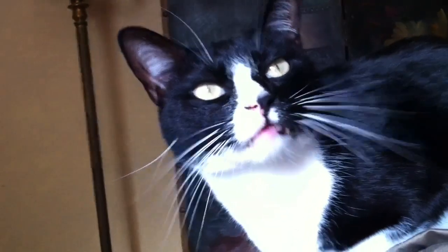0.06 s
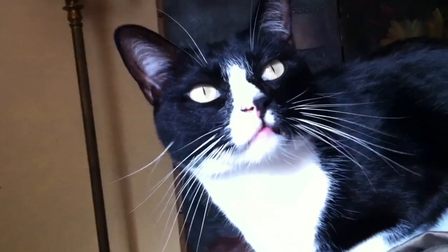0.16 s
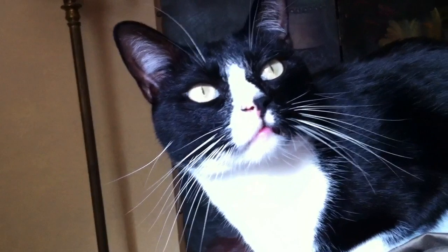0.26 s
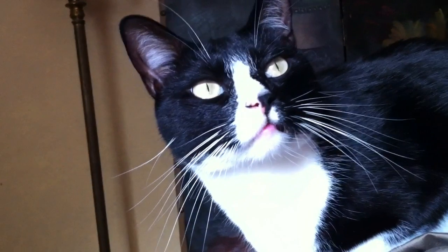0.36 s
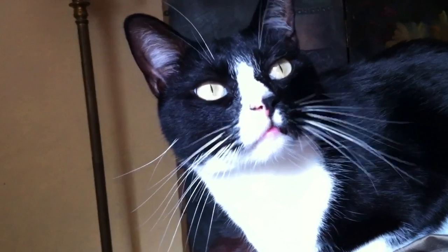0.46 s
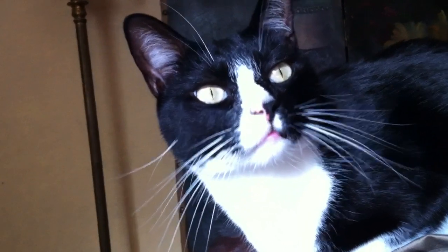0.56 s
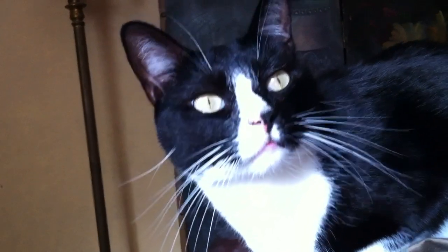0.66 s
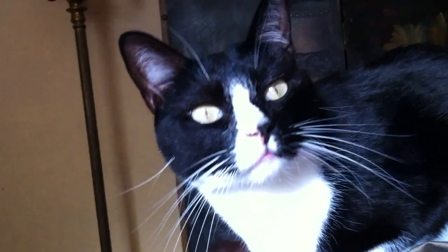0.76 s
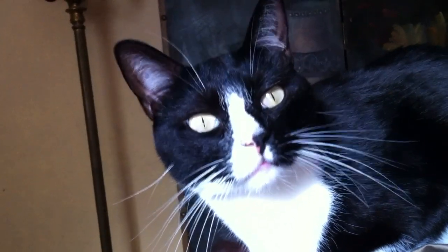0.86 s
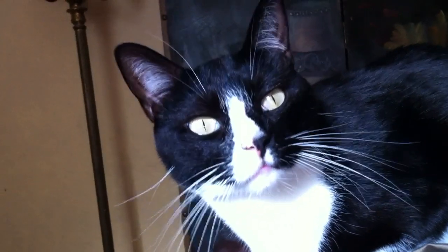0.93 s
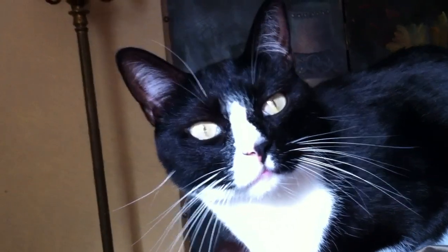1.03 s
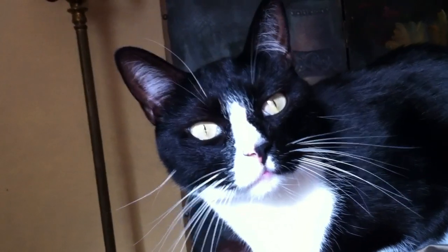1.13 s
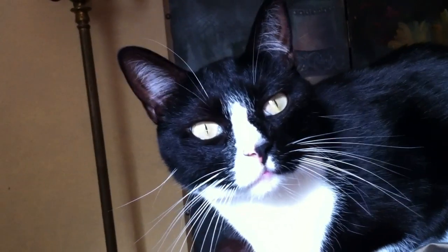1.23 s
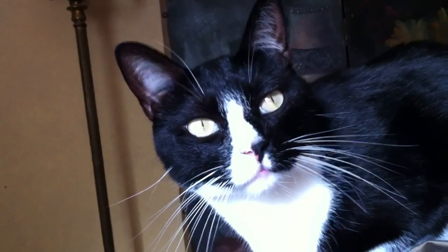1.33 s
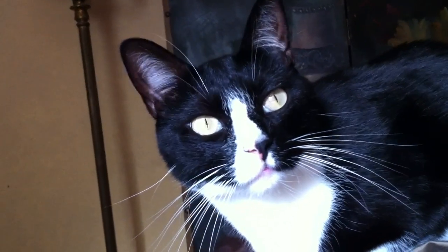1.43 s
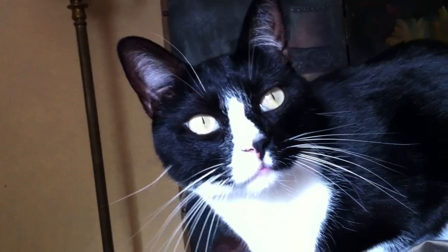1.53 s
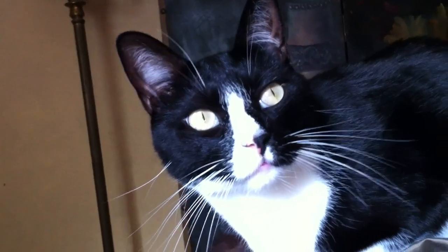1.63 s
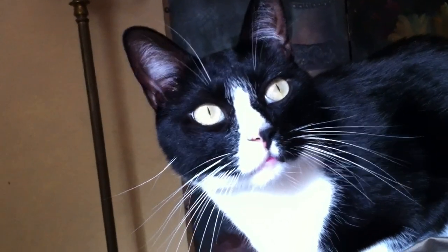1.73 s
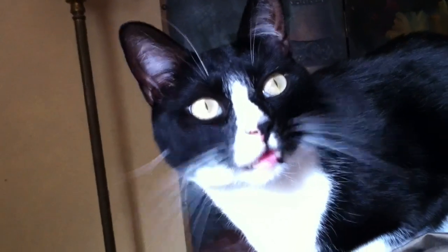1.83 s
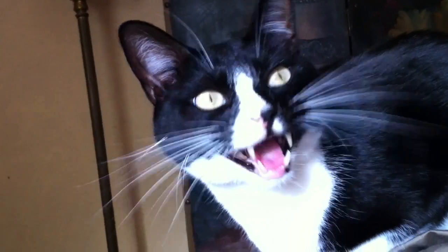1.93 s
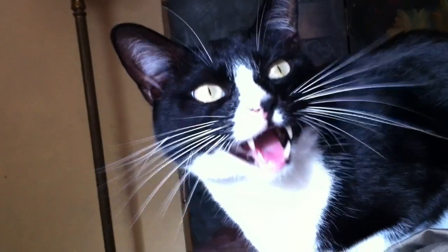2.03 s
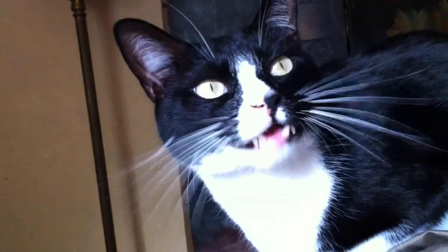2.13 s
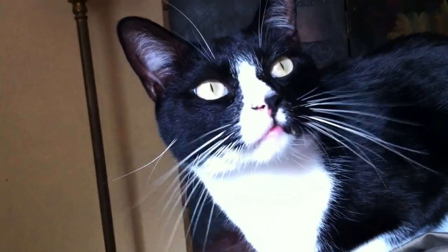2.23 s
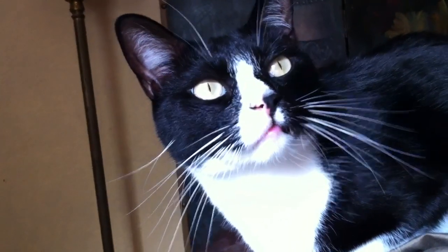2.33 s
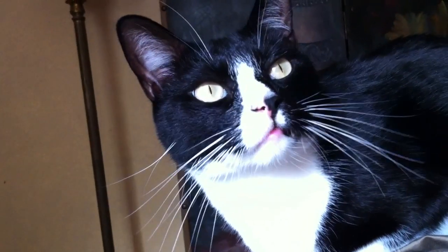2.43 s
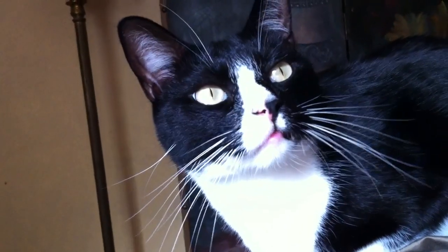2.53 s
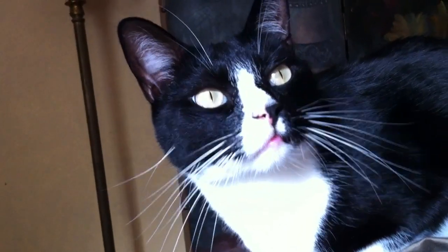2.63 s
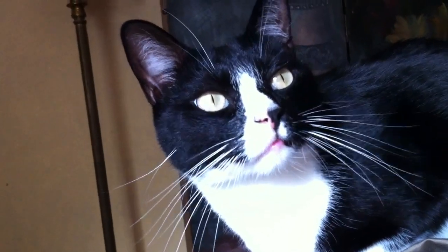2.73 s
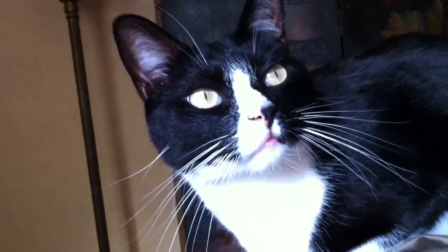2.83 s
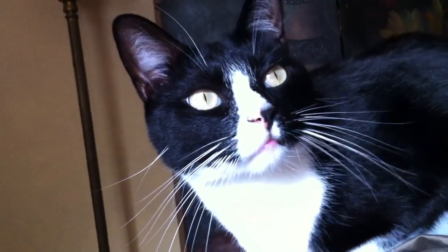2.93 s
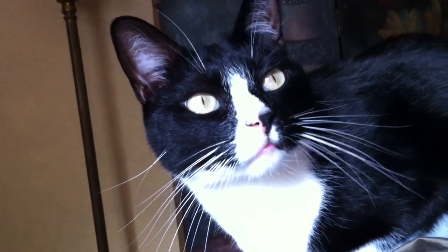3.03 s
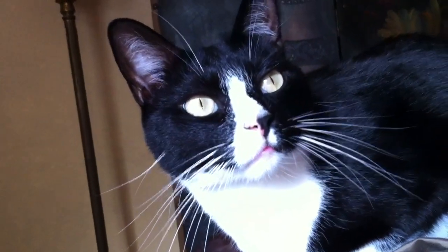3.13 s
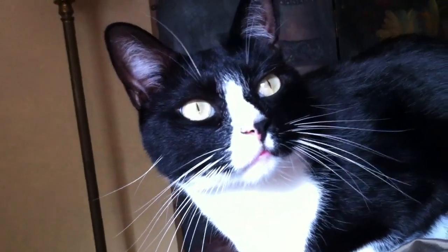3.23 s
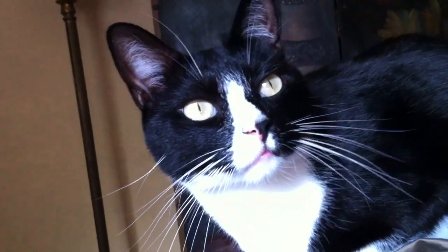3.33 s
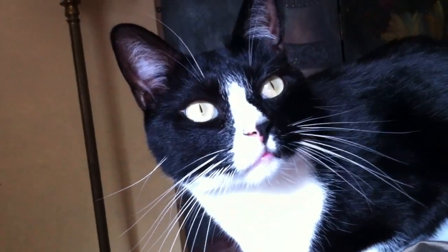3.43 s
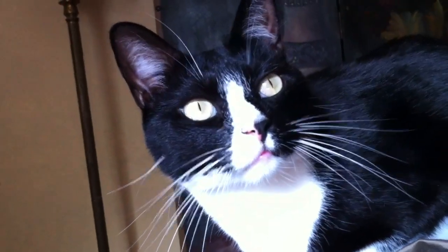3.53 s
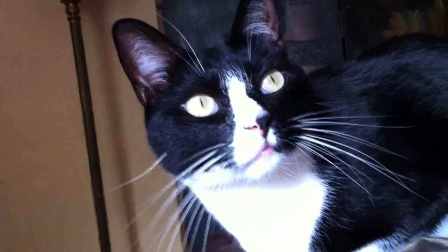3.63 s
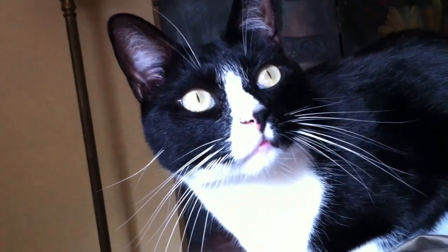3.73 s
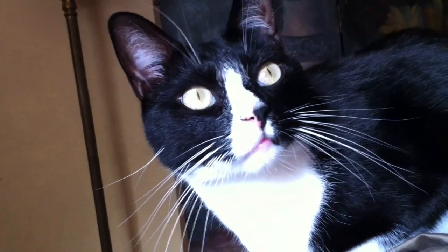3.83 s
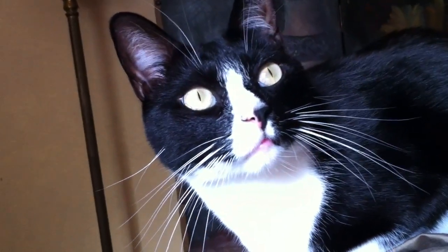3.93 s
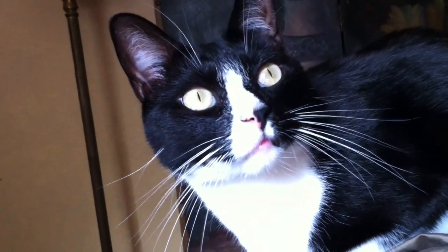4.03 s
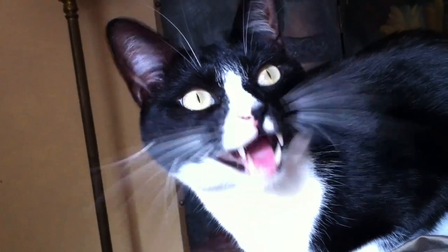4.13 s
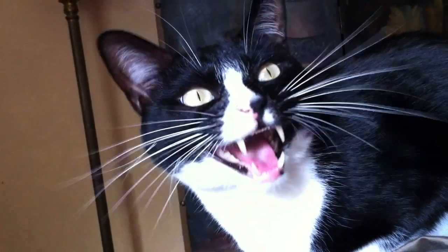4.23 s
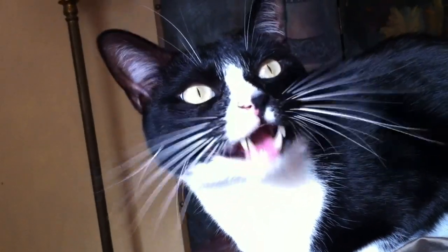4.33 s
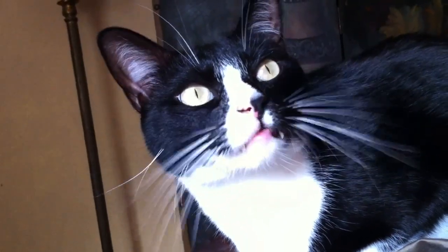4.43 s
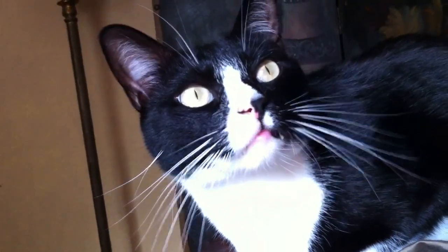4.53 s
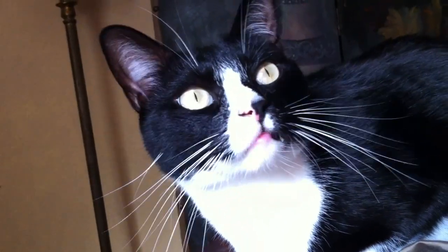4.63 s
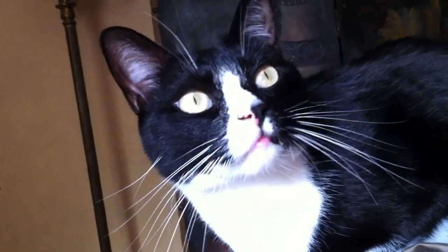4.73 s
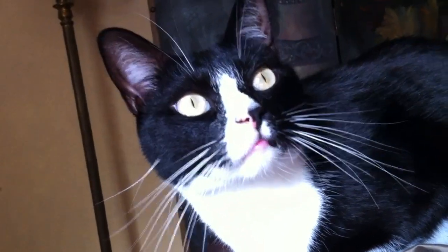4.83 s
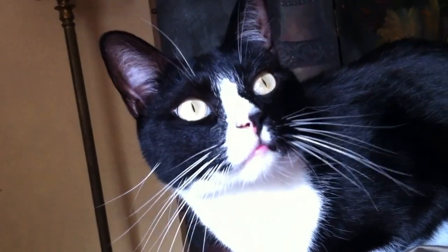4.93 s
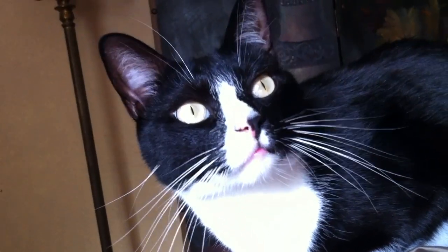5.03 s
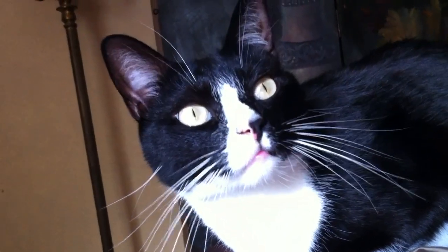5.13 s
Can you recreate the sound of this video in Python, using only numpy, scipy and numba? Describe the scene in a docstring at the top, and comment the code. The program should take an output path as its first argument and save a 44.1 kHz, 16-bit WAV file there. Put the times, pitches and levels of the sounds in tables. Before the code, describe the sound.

A cat close by gives three short, sharp, slightly raspy meows about two seconds apart, purring faintly between them in a quiet room.

```python
"""A quiet room: a cat close by meows three times and purrs softly in between.
Each cry is glottal pulses and turbulence through throat, mouth and nose: it opens with a rasp, its resonance falling
as the jaw closes, then flips up an octave into a thin closed-mouth whine and breaks into purred croaks.
A squeak leads into the second meow; lips smack, one faint tick sounds, the purr is a train of chest thumps.
Filtered noise for room air and hiss, with two wavering sines for a hum, lie underneath."""
import sys
import numpy as np
from scipy import signal
from scipy.fft import rfft, irfft
from scipy.io import wavfile
from scipy.ndimage import uniform_filter1d
from numba import njit

SR = 44100
rng = np.random.default_rng(int(sys.argv[2]) if len(sys.argv) > 2 else 0)


def materialize(psi):
    """Save the field psi as 16-bit PCM at rate SR to the path in sys.argv[1].

    A 1-D psi becomes a single channel; in a 2-D psi each row is a channel.
    """
    bounded = np.clip(np.atleast_2d(psi).T, -1, 1)
    quanta = np.round(bounded * 32767).astype(np.int16)
    wavfile.write(sys.argv[1], SR, quanta)


N = 227596
TIME = np.arange(N) / SR

# open-mouthed cries, the last row being the squeak before the second meow: start t/s, end t/s, attack t/s,
# jaw half shut after t/s, closing time constant t/s, wide-open mouth resonance f/Hz,
# wide-open second resonance f/Hz, level/dB, treble level/dB
CRY_SETTINGS = [(.004, 0.24, 0.016, 0.15, .028, 2320, 2770, -36, -39.5),
                (2.096, 2.336, 0.011, 0.18, 0.038, 2293, 2730, -36.5, -41.5),
                (4.312, 4.6, 0.025, 0.2, 0.047, 2523, 2910, -35, -37.5),
                (2.047, 2.097, .001, 0.22, 0.027, 2440, 2750, -47, -52.6)]
# pitch line of each cry: t/s, f/Hz
CRY_PITCH_LINES = [
    [(0.004, 340.2), (0.04, 307.3), (0.084, 295.7), (0.1, 307.1), (0.148, 289.3), (0.176, 299.6),
     (0.21, 292), (0.228, 302.7), (0.258, 338)],
    [(2.097, 350), (2.115, 314), (2.125, 307.2), (2.185, 300), (2.247, 295.8), (2.273, 309), (2.295, 298.8),
     (2.323, 320.5), (2.335, 322)],
    [(4.313, 316), (4.333, 295.7), (4.353, 307.1), (4.365, 285.9), (4.419, 295.2), (4.491, 290.3),
     (4.569, 312.4), (4.585, 322.6), (4.6, 322)],
]
# pitch line of the squeak, in the high register: t/s, f/Hz
SQUEAK_PITCH_LINE = [(2.048, 804), (2.063, 700), (2.074, 860), (2.097, 750)]
# rasp of each cry: opening roughness/0-1, lasting t/s, voice breaks after t/s, closing roughness/0-1
CRY_RASPS = [(.5, .014, .18, .35), (.35, .016, .185, .48), (.52, .066, .225, .58), (.12, .02, .022, .3)]
# throat resonances: f/Hz, width f/Hz, relative level/dB
THROAT_MODES = [(600, 290, 8), (974, 170, 15), (1135, 1230, 11.5)]
# fixed resonance that colours every cry: f/Hz, width f/Hz, level/dB
CRY_COLOUR_MODES = [(2110, 170, -1)]
# pitch line of the closed-mouth whine that ends each meow: t/s, f/Hz
WHINE_PITCH_LINES = [
    [(0.23, 626), (0.296, 651), (0.348, 651.6), (0.368, 674), (0.402, 642), (0.46, 637)],
    [(2.315, 657), (2.369, 677.4), (2.477, 708.6), (2.537, 663.5), (2.557, 718), (2.65, 680)],
    [(4.55, 629), (4.624, 666.7), (4.644, 644), (4.674, 715), (4.712, 675), (4.83, 693)],
]
# each whine at the usual pitch, halfway through: level/dB
WHINE_LEVELS = [-59, -54, -53]
# partials of the whine: multiple of the pitch, relative level/dB
WHINE_OVERTONES = [(1, -1.5), (2, -11), (3, -19), (4, -31)]
# runs of croaks as the voice breaks into a purr: first t/s, last t/s, croaks,
# level at mid-run/dB, half-length of each t/s
CROAK_RUNS = [(0.408, .598, 6, -54, 0.019), (2.516, 2.516, 1, -64, 0.0056), (2.655, 2.695, 3, -50.5, 0.012),
              (4.627, 4.625, 1, -44.5, 0.0065), (4.84, 4.841, 1, -49.5, 0.01),
              (4.878, 4.877, 1, -52.5, 0.018)]
# closed mouth ringing to the croaks: f/Hz, width f/Hz, relative level/dB
CROAK_RESONANCES = [(674, 52, 12), (956, 170, 10.5), (1370, 900, -51)]
# lips shut or part with a tick: t/s, level/dB
LIP_SMACKS = [(0.614, -60), (2.709, -49.5), (4.892, -51.5)]
# resonances of the lip smacks: f/Hz, width f/Hz, relative level/dB
LIP_RESONANCES = [(890, 630, 4.5), (2300, 480, 4), (3440, 610, 2.5), (5540, 1000, 6.5)]
# bouts of purring: start t/s, end t/s, pulse rate f/Hz, peak level at mid-bout/dB
PURR_BOUTS = [(1.0133, 1.195, 24.85, -55), (1.215, 1.67, 24.65, -59.5), (3.318, 4.1, 27, -58.5)]
# chest resonances: f/Hz, width f/Hz, relative level/dB
CHEST_MODES = [(115.4, 26, 4.5), (204, 160, -4.5), (364, 450, -7)]
# a faint lone tick: t/s, f/Hz, level/dB, decay t/s
LONE_TICK = (1.667, 2050, -54.5, .004)
# nearby surfaces: delay t/s, level/dB
EARLY_ECHOES = [(.00125, -18), (.00295, -23), (.0052, -23)]
# tonal colour of room air and microphone hiss: f/Hz, relative density level/dB per Hz
AIR_COLOUR = [(20, -27), (60, -28), (90, -27.5), (125, -10), (210, -9.5), (290, -5), (330, -7.5),
              (400, -13.5), (700, -17), (2000, -20.5), (8500, -25.5), (15500, -26)]
# appliance hum: f/Hz, level/dB
HUM_TONES = [(260.5, -70), (111, -84.5)]

# cry: the two lower resonances close down to the SHUT values, the top one dips midway
MOUTH_SHUT_HZ, SECOND_SHUT_HZ = 920, 2290
TOP_MIDWAY_HZ, TOP_OPEN_HZ, TOP_SHUT_HZ = 4110, 5020, 4550
MOUTH_MUFFLING, TREBLE_MUFFLING = 1.53, 3.35   # dB lost per dB that the mouth resonance falls
# the push of air runs out
MOUTH_SAG_DB_PER_S, TREBLE_SAG_DB_PER_S, THROAT_SAG_DB_PER_S = 4.5, 24.5, 24
ONSET_SHARE = 0.39   # a cry jumps to this share of its strength, then swells
CLEAR_ROUGHNESS, RASP_CHANGE_S = .065, .004
THROB_HZ, THROB_DB = 34.1, 2.5   # a rough voice throbs; depth at full roughness
# whine: effort lifts pitch and level together, then ebbs
WHINE_USUAL_HZ, WHINE_DB_PER_HZ, WHINE_SAG_DB_PER_S = 673.5, 0.0542, 13.5
WHINE_FLUTTER_DB, OVERTONE_FLUTTER_DB, FLUTTER_PER_S = 1.0, 2.2, 110
WHINE_WAVER_DB, WAVER_PER_S = 1.5, 40
HALF_TONE_DB, HALF_TONE_SWING_DB = -23, 5
# croaks and purr: runs and bouts are weaker at their edges; a creak runs under each whine
CROAK_EDGE_DB, PURR_EDGE_DB = 7.5, 3.5
CREAK_DB, CREAK_SWING_DB, CREAK_PER_S = -13, 4, 50
PURR_TOP_HZ = 530
AIR_DB = -66.5   # level of the air noise above 530 Hz
CUTOFF_HZ = 15780


def amp(db):
    """Decibels to gain."""
    return 10 ** (np.asarray(db) / 20)


def rms_one(x):
    """Scale to unit power."""
    return x / np.sqrt(np.mean(x ** 2) + 1e-20)


def evened(x, window_s):
    """Hold the short-term power at one."""
    power = np.abs(uniform_filter1d(x ** 2, max(int(window_s * SR), 8)))
    return x / np.sqrt(power + 1e-12)


def curves(rows, t):
    """Read each column of a table at the times t."""
    s, *columns = np.transpose(rows)
    return [np.interp(t, s, c) for c in columns]


def gate(start, end, fade_s):
    """The samples that a call covers, and its soft-edged on/off envelope."""
    edge = np.clip(np.minimum(TIME - start, end - TIME) / fade_s + .5, 0, 1)
    where = np.flatnonzero(edge)
    return where, np.sin(edge[where] * np.pi / 2) ** 2


def step(t, width_s):
    """A smooth step from 0 to 1 around t = 0."""
    return .5 + .5 * np.tanh(t / (2 * width_s))


def arch(count, edge_db):
    """Levels in dB of a run of pulses that swells and fades."""
    return -edge_db * ((2 * np.arange(count) + 1) / count - 1) ** 2


def cut(x, hz, kind, order=2):
    """Butterworth filter."""
    return signal.sosfilt(signal.butter(order, hz, kind, fs=SR, output="sos"), x)


def drift(rate):
    """Random wander: straight lines between unit-spread random points, rate of them a second."""
    knots = rng.standard_normal(N)
    return np.interp(TIME * rate, np.arange(N), knots)


@njit
def resonate(x, hz, width):
    """Two-pole resonance with a moving centre; gain one on top."""
    y, r = np.zeros(len(x)), np.exp(-np.pi * width / SR)
    for i in range(2, len(x)):
        drive = (1 - r * r) / 2 * (x[i] - x[i - 2])
        y[i] = drive + 2 * r * np.cos(2 * np.pi * hz[i] / SR) * y[i - 1] - r * r * y[i - 2]
    return y


def body(x, modes):
    """Fixed resonances in parallel, signs alternating."""
    x = x + 1e-18 * (np.arange(len(x)) % 3)   # an inaudible floor under digital silence
    out = 0
    for k, (hz, width, db) in enumerate(modes):
        out = out + (-1) ** k * amp(db) * resonate(x, np.full(len(x), float(hz)), float(width))
    return out


def cry(row, rasp, pitch_rows, mouth_width=138.0, second_width=97.0, second_db=-3.5, second_power=3.7,
        open_hz=2120.0, nose_hz=3195.0, nose_width=320.0, top_width=196.0, top_db=-11.5, throat_db=-10.0,
        hiss_db=0.0, rasp_treble_db=5.5, nose_power=3.3):
    """The folds sound through throat, mouth and nose; a wide jaw raises the resonances and frees the upper ones."""
    start, end, attack_s, half_shut_s, closing_s, wide_hz, second_wide_hz, level_db, treble_db = row
    where, on = gate(start, end, fade_s=.003)
    t = TIME[where]
    age = t - t[0]
    mouth_hz, second_hz, top_hz = tract(age, half_shut_s, closing_s, wide_hz, second_wide_hz)
    rough = roughness(age, *rasp)
    swell = np.minimum(1, ONSET_SHARE + (1 - ONSET_SHARE) * age / attack_s)
    throb = amp(THROB_DB * rough * np.cos(2 * np.pi * THROB_HZ * (age - attack_s)))
    on = on * swell * throb

    closing = mouth_hz / wide_hz
    throat_level = amp(level_db + throat_db - THROAT_SAG_DB_PER_S * age)
    mouth_level = amp(level_db - MOUTH_SAG_DB_PER_S * age) * closing ** MOUTH_MUFFLING
    treble_level = amp(treble_db + rasp_treble_db * rough - TREBLE_SAG_DB_PER_S * age)
    treble_level = treble_level * closing ** TREBLE_MUFFLING

    source = folds(curves(pitch_rows, t)[0], rough, where)
    opening = mouth_hz / open_hz
    throat = cut(cut(body(source, THROAT_MODES), 627, "high", order=3), 1110, "low")
    second = amp(second_db) * opening ** second_power * resonate(source, second_hz, second_width)
    mouth = cut(second - resonate(source, mouth_hz, mouth_width), 5200, "low", order=4)
    mouth = mouth + body(mouth, CRY_COLOUR_MODES)
    nose_line = np.full(len(t), nose_hz)
    nose = resonate(resonate(source, nose_line, nose_width), nose_line, 1300.0)
    top = amp(top_db) * resonate(resonate(source, top_hz, top_width), top_hz, 1400.0)
    # a forced, rough voice hisses between the teeth
    jet = cut(cut(rng.standard_normal(N)[where], 1730, "high", order=3), 5360, "low", order=8)
    hiss = amp(hiss_db) * rough * opening ** 4 * jet
    treble = top - opening ** nose_power * nose + hiss

    out = np.zeros(N)
    for part, level in (throat, throat_level), (mouth, mouth_level), (treble, treble_level):
        out[where] += on * level * evened(part, window_s=0.0092)
    return out


def tract(age, half_shut_s, closing_s, wide_hz, second_wide_hz):
    """The jaw closes in one smooth move: the two lower resonances fall with it, the top one dips midway."""
    jaw = step(half_shut_s - age, closing_s)
    mouth_hz = MOUTH_SHUT_HZ + jaw * (wide_hz - MOUTH_SHUT_HZ)
    second_hz = SECOND_SHUT_HZ + jaw * (second_wide_hz - SECOND_SHUT_HZ)
    top_end_hz = np.where(jaw > .5, TOP_OPEN_HZ, TOP_SHUT_HZ)
    top_hz = TOP_MIDWAY_HZ + (2 * jaw - 1) ** 2 * (top_end_hz - TOP_MIDWAY_HZ)
    return mouth_hz, second_hz, top_hz


def roughness(age, opening, lasting_s, breaks_s, closing):
    """A cry starts with a rasp, clears, and roughens again as the voice breaks."""
    opening_rasp = (opening - CLEAR_ROUGHNESS) * step(lasting_s - age, RASP_CHANGE_S)
    closing_rasp = (closing - CLEAR_ROUGHNESS) * step(age - breaks_s, RASP_CHANGE_S)
    return CLEAR_ROUGHNESS + opening_rasp + closing_rasp


def folds(pitch, rough, where, jitter=0.049, shimmer=0.29, turbulence=4.0, turbulence_hz=1050.0, rebound=0.016):
    """Glottal pulses with a weak rebound halfway; roughness makes them uneven and adds bright puffs of turbulence."""
    uneven_pitch = pitch * (1 + jitter * rough * drift(400)[where])
    phase = 2 * np.pi * np.cumsum(uneven_pitch) / SR
    pulses = rms_one(sum((1 + rebound * (-1) ** k) * np.cos(k * phase) for k in range(1, 27)))
    breath = cut(rng.standard_normal(N)[where], turbulence_hz, "high")
    puffs = rms_one((2 + np.cos(phase)) * breath)
    return pulses * (1 + shimmer * rough * drift(500)[where]) + turbulence * rough * puffs


def whine(pitch_rows, usual_db, jitter=0.0098, loud_db=-59.0, steepen=0.28, top_db=-17.0, top_width=320.0,
          ring_hz=5150.0, leak_db=-14.5, lips_rise_hz=650.0, lips_closing_s=0.15, top_fade_db_per_s=18.0):
    """With the mouth nearly shut the folds flip up an octave into an unsteady tone, the purer the softer it is."""
    where, on = gate(pitch_rows[0][0], pitch_rows[-1][0], fade_s=.014)
    age = TIME[where] - TIME[where[0]]
    pitch, = curves(pitch_rows, TIME[where])
    effort_db = WHINE_DB_PER_HZ * (pitch - WHINE_USUAL_HZ)
    level_db = usual_db + effort_db - WHINE_SAG_DB_PER_S * (age - age.mean())
    phase = 2 * np.pi * np.cumsum(pitch * (1 + jitter * drift(180)[where])) / SR
    tone = 0
    for k, (multiple, db) in enumerate(WHINE_OVERTONES):
        overtone_db = steepen * (level_db - loud_db) + OVERTONE_FLUTTER_DB * drift(FLUTTER_PER_S)[where]
        tone += np.sqrt(2) * amp(db + (k > 0) * overtone_db) * np.sin(round(multiple) * phase)
    # a partial at one and a half times the pitch makes alternate cycles differ, by a wandering amount
    half_tone = amp(HALF_TONE_DB + HALF_TONE_SWING_DB * drift(WAVER_PER_S)[where])
    tone += half_tone * np.sin(phase + phase / 2 + drift(FLUTTER_PER_S)[where])

    # the top resonance keeps ringing, and fades as the lips push it higher
    top_hz = TOP_SHUT_HZ + lips_rise_hz * (1 - np.exp(-age / lips_closing_s))
    air = rng.standard_normal(N)[where]
    buzz = sum(np.cos(k * phase) for k in range(5, 10)) + 4 * air
    top = rms_one(resonate(resonate(buzz, top_hz, top_width), top_hz, 2 * top_width))
    top *= np.minimum(1, ring_hz / top_hz) ** 9 * amp(-top_fade_db_per_s * age)
    leak = rms_one(cut(air, [750, 2600], "band", order=1))   # air rustles between the lips

    flutter_db = WHINE_FLUTTER_DB * drift(FLUTTER_PER_S)[where]
    waver_db = WHINE_WAVER_DB * drift(WAVER_PER_S)[where]
    voice = tone + amp(top_db) * top + amp(leak_db) * leak
    out = np.zeros(N)
    out[where] = on * amp(level_db + flutter_db + waver_db) * voice
    return out


def croaks(slap_hz=329.3, uneven=.3, air_db=-6.0, thump_db=-0.5):
    """Slack folds slap unevenly and ring the closed mouth, in short runs and faintly under each whine."""
    envelope = np.zeros(N)
    for first, last, count, level_db, length in CROAK_RUNS:
        count = round(count)
        for s, db in zip(np.linspace(first, last, count), arch(count, CROAK_EDGE_DB)):
            envelope += amp(level_db + db) * np.exp(-2 * ((TIME - s) / length) ** 2)
    creak = amp(CREAK_DB + CREAK_SWING_DB * drift(CREAK_PER_S))
    for pitch_rows, whine_db in zip(WHINE_PITCH_LINES, WHINE_LEVELS):
        where, on = gate(pitch_rows[0][0], pitch_rows[-1][0], fade_s=0.089)
        envelope[where] += on * amp(whine_db) * creak[where]
    cycles = np.cumsum(slap_hz * np.exp(uneven * drift(300))) / SR
    clicks = rms_one(np.diff(np.floor(cycles), prepend=0))   # one click a cycle
    slaps = clicks + amp(air_db) * rng.standard_normal(N)
    rattle = cut(body(slaps, CROAK_RESONANCES), [380, 1500], "band")
    thump = amp(thump_db) * cut(slaps, [250, 520], "band")   # the throat adds a dull body
    return envelope * evened(rattle + thump, window_s=0.014)


def smacks(decay_s=0.0063):
    """A tiny wet crackle as the lips move: resonant noise with a sudden start and a quick decay."""
    envelope = sum(amp(db) * (TIME >= s) * np.exp(-np.abs(TIME - s) / decay_s) for s, db in LIP_SMACKS)
    crackle = cut(body(rng.standard_normal(N), LIP_RESONANCES), [500, 6200], "band", order=2)
    return envelope * rms_one(crackle)


def purr(uneven_db=1.0):
    """The larynx snaps open about 25 times a second and thumps the chest."""
    snaps = np.zeros(N)
    for start, end, rate, peak_db in PURR_BOUTS:
        times = np.arange(start, end, 1 / rate)
        wobble_db = uneven_db * rng.standard_normal(N)[:len(times)]
        snaps[(times * SR).astype(int)] = amp(peak_db + arch(len(times), PURR_EDGE_DB) + wobble_db)
    ring = body(signal.unit_impulse(SR // 10, 2), CHEST_MODES)
    thump = cut(cut(ring, PURR_TOP_HZ, "low", order=4), 119.6, "high", order=5)
    return signal.fftconvolve(snaps, thump / np.abs(thump).max())[:N]


def tick():
    """One short, damped ring."""
    s, hz, level_db, decay_s = LONE_TICK
    age = np.maximum(TIME - s, 0)
    return amp(level_db) * np.exp(-age / decay_s) * np.sin(2 * np.pi * hz * age)


def room(x, t60=0.26, wet_db=-16, wall_hz=4500):
    """Nearby surfaces send back quick echoes; the small furnished room adds a short, dull tail."""
    t = TIME[:SR // 2]
    tail = cut(rng.standard_normal(len(t)), wall_hz, "low") * amp(-60 * t / t60) * (t > .003)
    early = sum(amp(db) * np.interp(TIME - delay, TIME, x, left=0) for delay, db in EARLY_ECHOES)
    return x + early + amp(wet_db) * signal.fftconvolve(x, tail / np.linalg.norm(tail))[:N]


def background():
    """Steady room air and microphone hiss, with the slightly wavering hum of an appliance."""
    hz, db = np.transpose(AIR_COLOUR)
    bins_hz = np.arange(N // 2 + 1) * SR / N
    colour = amp(np.interp(np.log(bins_hz + 1), np.log(hz), db))
    air = irfft(rfft(rng.standard_normal(N)) * colour, N)
    air *= amp(AIR_DB) / np.std(cut(air, 530, "high", order=4))
    hum = 0
    for tone_hz, tone_db in HUM_TONES:
        level = amp(tone_db + 0.18 * drift(21.0)) * np.sqrt(2)
        hum = hum + level * np.sin(2 * np.pi * tone_hz * TIME + 0.51 * drift(1.99))
    return air + hum


def scene():
    """The cat and the tick in the room, over the background."""
    cries = sum(map(cry, CRY_SETTINGS, CRY_RASPS, [*CRY_PITCH_LINES, SQUEAK_PITCH_LINE]))
    whines = sum(map(whine, WHINE_PITCH_LINES, WHINE_LEVELS))
    cat = cries + whines + croaks() + smacks() + purr()
    return (room(cat + tick()) + background())[None]


def record(dry):
    """The top is cut steeply by an elliptic low-pass."""
    return signal.sosfilt(signal.ellip(12, .1, 70, CUTOFF_HZ, fs=SR, output="sos"), dry)


dry = scene()
out = record(dry)
materialize(out)
```